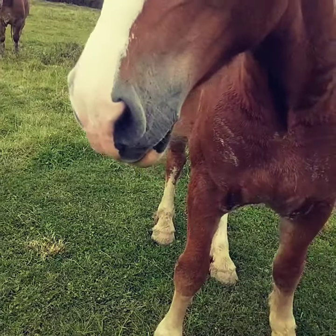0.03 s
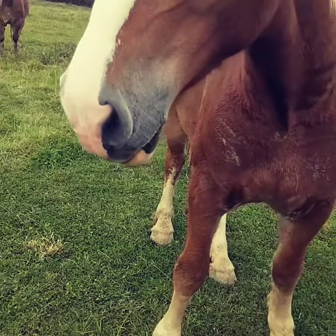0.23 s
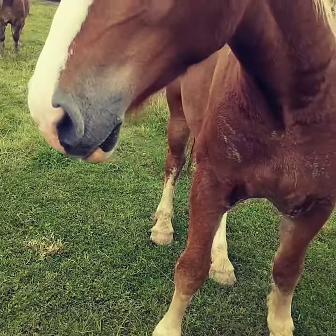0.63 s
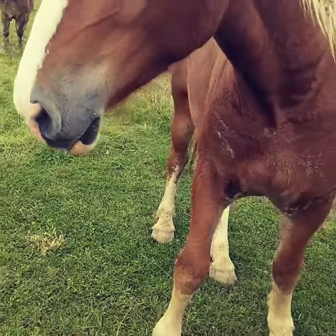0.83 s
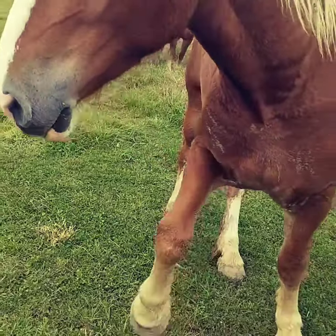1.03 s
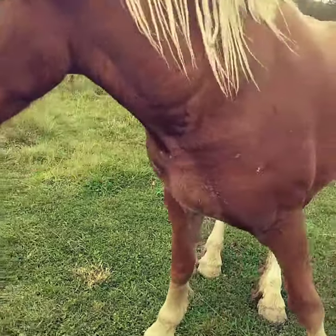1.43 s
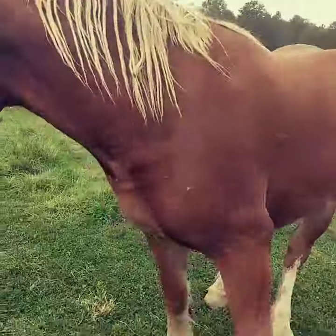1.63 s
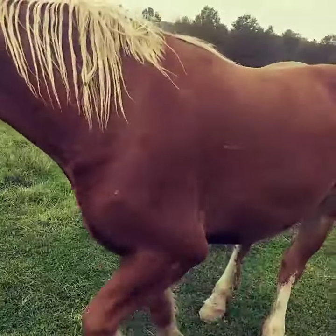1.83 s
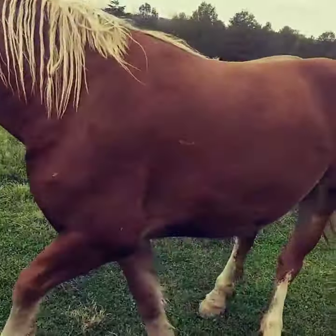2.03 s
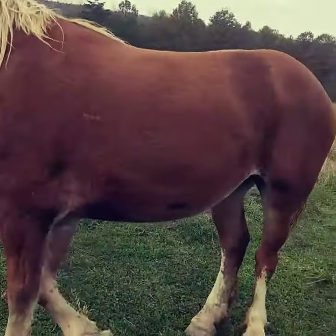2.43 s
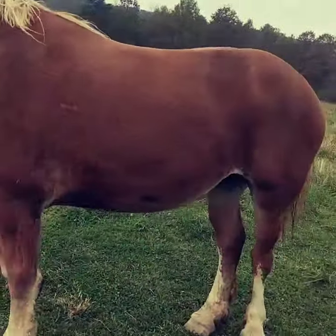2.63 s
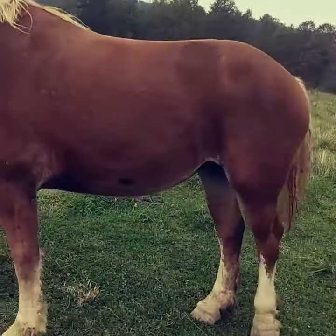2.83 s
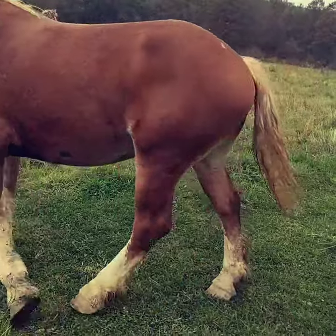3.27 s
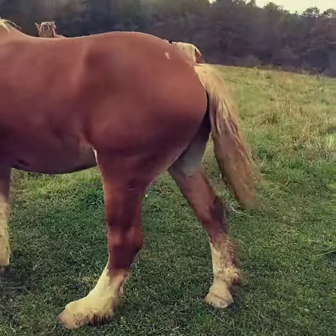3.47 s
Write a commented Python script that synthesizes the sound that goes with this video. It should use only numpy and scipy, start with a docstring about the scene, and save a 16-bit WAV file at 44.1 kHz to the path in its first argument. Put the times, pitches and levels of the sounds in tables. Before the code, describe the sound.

Dull, irregular hoof thuds of a horse passing close to the microphone in a grassy field, joined by swishing grass, tiny stalk snaps and a few small clacks. Underneath are a low breeze rumble and very faint insects.

```python
"""A low rumble of wind on a hand-held microphone, with insects hissing faintly in a grassy field.
A heavy horse walks slowly past, close by. Its hoof falls and puffs of breeze arrive as dull thumps,
short swings of low pressure, with a soft crush of turf and now and then a small hard clack.
Its legs swish through the grass, stalks snap, and hide and hoof rub on the turf."""
import sys
import numpy as np
from scipy import signal
from scipy.fft import rfft, irfft
from scipy.io import wavfile

SR = 44100
rng = np.random.default_rng(int(sys.argv[2]) if len(sys.argv) > 2 else 0)


def file_out(sig):
    """Save sig as 16-bit WAV at sys.argv[1]."""
    # one column per channel
    cols = np.atleast_2d(sig).T
    # limit, then scale
    lim = np.clip(cols, -1, 1)
    pcm = np.round(lim * 32767).astype(np.int16)
    wavfile.write(sys.argv[1], SR, pcm)


N = 154350
TIME = np.arange(N) / SR


def amp(db):
    """Decibels to gain."""
    return 10 ** (np.asarray(db) / 20)


def unit(x):
    """Scales to an rms of one."""
    return x / np.sqrt(np.mean(x ** 2) + 1e-20)


def shaped(x, gain):
    """Filters x by a gain given as a function of frequency."""
    return irfft(rfft(x) * gain(np.fft.rfftfreq(len(x), 1 / SR) + 1), len(x))


def coloured(x, points):
    """Filters x by a curve of (Hz, dB) points and scales it to unit rms."""
    f, db = np.transpose(points)
    return unit(shaped(x, lambda hz: amp(np.interp(np.log(hz), np.log(f), db))))


def drift(hz):
    """A random wander at unit rms, up to about the given rate."""
    return unit(shaped(rng.standard_normal(N), lambda f: np.exp(-(f / hz) ** 2)))


def swell(peak_s, rise, fall):
    """A smooth bell of level with its own rise and fall in seconds."""
    return np.exp(-.5 * ((TIME - peak_s) / np.where(TIME < peak_s, rise, fall)) ** 2)


def add(mix, start_s, sound):
    """Mixes a sound in at a time."""
    part = mix[max(round(start_s * SR), 0):][:len(sound)]
    part += sound[:len(part)]


# Open air all around the microphone. Each row: frequency in Hz, relative level in dB.
AIR_SPECTRUM = [(30, 3), (100, 13.5), (250, 3), (500, 0.5), (1000, -4.5), (2000, -7.5), (4000, -10),
                (6500, -13), (8000, -15.5), (9000, -21), (11000, -19.5), (16000, -22)]
# The slow swell of that hush. Each row: time in seconds, relative level in dB.
AIR_SWELL = [(0, 1), (.55, 0), (.95, -1), (1.3, 0.5), (1.75, 0.5), (2.05, -0.3), (2.6, 1.8), (2.88, 0.5),
             (3.5, 1.5)]

def air(level_db=-66.5):
    """The soft hush of the field, swelling a little."""
    level = level_db + np.interp(TIME, *np.transpose(AIR_SWELL))
    return amp(level) * coloured(rng.standard_normal(N), AIR_SPECTRUM)


# Insects, faint out in the field. Each row: start and end in seconds, pitch in Hz, level in dB.
INSECT_BURSTS = [(0, .25, 9960, -79.5), (0.023, .17, 10900, -83), (0, .17, 8550, -86),
                 (0.159, 0.375, 9500, -85), (0.229, .48, 8470, -85), (0.535, 0.662, 8400, -82),
                 (2.37, 2.472, 8300, -75.5), (2.534, 2.74, 8330, -79), (2.758, 2.866, 8400, -91)]

def insects(half_width_hz=220, fade_s=0.026, throb_db=1.5, throb_hz=58):
    """Insects come and go as thin, throbbing bands of hiss."""
    out = np.zeros(N)
    for start, end, hz, db in INSECT_BURSTS:
        t = np.arange(0, end - start, 1 / SR)
        noise = rng.standard_normal(N // 4)
        hiss = unit(shaped(noise, lambda f: 1 / (1 + ((f - hz) / half_width_hz) ** 2)))[:len(t)]
        fade = np.clip(np.minimum(t, t[::-1]) / fade_s, 0, 1)
        add(out, start, amp(db) * hiss * fade)
    return out * amp(throb_db * drift(throb_hz))


# Breeze right on the microphone. Each row: time in seconds, level in dB.
WIND_GUSTS = [(0, -57.5), (.2, -56), (.26, -51.5), (.56, -39.5), (.65, -53), (.8, -43.5), (1.25, -46.5),
              (1.36, -39.5), (1.47, -50), (1.6, -43), (1.72, -47.5), (1.9, -44), (2.55, -51), (2.66, -53.5),
              (2.85, -49.5), (3.12, -46.5), (3.27, -55), (3.5, -56)]
# Its deep rumble. Each row: frequency in Hz, relative level in dB.
WIND_SPECTRUM = [(15, -46.5), (30, -14), (48, 2.5), (65, 3.5), (100, -4.5), (150, -15.5), (220, -31.5),
                 (320, -39.5), (700, -83), (2000, -84)]

def wind(lumps_db=1, lumps_hz=14):
    """The breeze buffets the microphone with a lumpy low rumble."""
    level = np.interp(TIME, *np.transpose(WIND_GUSTS))
    rumble = coloured(rng.standard_normal(N), WIND_SPECTRUM)
    lumps = amp(lumps_db * drift(lumps_hz))
    return amp(level) * unit(rumble * lumps)


# Hide and hoof rubbing on the turf nearby. Each row: peak time and width in seconds, level in dB.
BODY_RUBS = [(.55, 0.25, -84), (1.12, 0.064, -76), (1.33, 0.15, -72), (1.475, 0.057, -65.5),
             (2.38, 0.049, -77), (2.53, 0.024, -73), (3.11, 0.045, -80)]
# The dull tone of a rub. Each row: frequency in Hz, relative level in dB.
RUB_SPECTRUM = [(100, -23), (300, 5.5), (700, -1), (1500, -3), (2800, -8.5), (5000, -13.5), (12000, -35)]

def rubs():
    """Soft swells of rubbing noise as the body moves."""
    power = sum((amp(db) * swell(s, width, width)) ** 2 for s, width, db in BODY_RUBS)
    return np.sqrt(power) * coloured(rng.standard_normal(N), RUB_SPECTRUM)


# Legs brushing through grass, close to the microphone.
# Each row: peak time, rise and fall in seconds, relative level in dB, share of crackle from 0 to 1.
LEG_STROKES = [(1.086, 0.0047, 0.014, -57.5, 0), (1.132, 0.022, 0.016, -62, 0.3),
               (1.24, 0.092, 0.083, -70.5, 0.2), (1.39, 0.044, 0.046, -68, 0.1),
               (1.45, 0.015, 0.0048, -53, 0.9), (1.504, 0.027, 0.018, -57.5, 0.75),
               (1.645, 0.044, 0.06, -66.5, 1), (1.81, 0.035, 0.066, -65.5, 0.8),
               (1.915, 0.047, 0.058, -63.5, 0.38), (2.19, 0.068, .05, -67.5, .4),
               (2.31, 0.059, 0.074, -65.5, 0.04), (2.396, 0.021, 0.0093, -56, 0.44),
               (2.44, 0.02, 0.034, -68.5, 0.9), (2.53, 0.013, 0.0085, -54, 0.75),
               (2.6, 0.14, 0.17, -66.5, .3), (2.975, 0.017, 0.023, -63, 0.5),
               (3.175, 0.074, 0.062, -63.5, 0.93), (3.33, 0.031, 0.036, -65, .5),
               (3.49, 0.033, .05, -71.5, 0.5)]
# Brushed grass at close range. Each row: frequency in Hz, relative level in dB.
GRASS_SPECTRUM = [(100, 8), (300, 0.5), (800, -2), (2000, -0.5), (3500, 0.5), (5300, 3), (7000, 5),
                  (9000, 5), (11000, -7.5), (16000, -13.5)]

def swishes(blades_per_s=3200, spread_db=4, gain_db=-3.5):
    """Blades flick against the legs: tiny clicks over a smooth rub, swelling with each stroke."""
    sizes = amp(spread_db * np.minimum(rng.exponential(1, N), 4))
    signs = rng.choice([-1, 1], N)
    hits = rng.random(N) < blades_per_s / SR
    flicks = coloured(sizes * signs * hits, GRASS_SPECTRUM)
    rub = coloured(rng.standard_normal(N), GRASS_SPECTRUM)
    flick_power, rub_power = np.zeros((2, N))
    for s, rise, fall, db, crackle in LEG_STROKES:
        power = (amp(db) * swell(s, rise, fall)) ** 2
        flick_power += crackle * power
        rub_power += (1 - crackle) * power
    return amp(gain_db) * (np.sqrt(flick_power) * flicks + np.sqrt(rub_power) * rub)


# Stalks breaking in the horse's path. Each row: start in seconds, relative level in dB, pitch in Hz.
STALK_SNAPS = [(0.4163, -47.5, 6850), (0.4297, -43.5, 6940), (0.4278, -49, 3220), (1.0815, -53, 6760),
               (1.137, -43.5, 8500), (1.4515, -56, 4500), (1.4517, -39, 3800), (1.466, -35.5, 7600),
               (1.4912, -41, 8500), (1.498, -60, 2800), (1.5143, -32, 7340), (1.562, -63, 4540),
               (1.568, -40, 8640), (1.6228, -46, 7050), (1.636, -52, 6000), (1.6466, -39, 7600),
               (2.398, -50, 8000), (2.4845, -43.5, 6500), (2.528, -47, 8000), (2.901, -56, 8000),
               (2.9488, -34, 5100), (2.984, -57, 7940), (3.2964, -50, 8100), (3.323, -45, 8000)]

def snaps(rise_s=0.0002, decay_s=0.00065, tail_s=0.0051, tail_db=-23.5, width_oct=0.55, gain_db=-1):
    """A stalk breaks in a millisecond crack with a faint tail."""
    out, t = np.zeros(N), np.arange(2048) / SR
    attack = 1 - np.exp(-t / rise_s)
    decay = np.exp(-t / decay_s) + amp(tail_db) * np.exp(-t / tail_s)
    for s, db, hz in STALK_SNAPS:
        noise = rng.standard_normal(len(t))
        crack = unit(shaped(noise, lambda f: 1 / (1 + (np.log2(f / hz) / width_oct) ** 2)))
        add(out, s, amp(db + gain_db) * attack * decay * crack)
    return shaped(out, lambda f: 1 / np.sqrt(1 + (f / 9260) ** 12))  # steep low-pass


# Small hard clacks at ground level, under the hooves.
# Each row: start in seconds, level in dB, pitch in Hz, relative level of the grit in dB.
HOOF_CLACKS = [(.2985, -49.5, 1130, -13.5), (2.2115, -48, 1010, -1.5), (2.2143, -51, 1060, -3),
               (2.2632, -58.5, 1730, 3.5), (3.087, -60.5, 940, 1.5)]
# The modes of a clack. Each row: ratio to the pitch, relative level in dB, seconds to fall by 60 dB.
RING_MODES = [(.38, -9, 0.011), (1, 3, 0.015), (2.15, -5, 0.005), (3.3, -6, 0.005)]
# Its gritty tick. Each row: frequency in Hz, relative level in dB.
GRIT_SPECTRUM = [(300, 4.5), (3800, -3), (6000, -20), (9000, -31), (16000, -47)]

def clacks(grit_decay_s=0.0039):
    """A hard contact under a hoof gives a gritty tick and a short woody ring."""
    out, t = np.zeros(N), np.arange(2048) / SR
    for s, db, hz, grit_db in HOOF_CLACKS:
        ring = sum(amp(level - 60 * t / t60) * np.sin(2 * np.pi * hz * ratio * t)
                   for ratio, level, t60 in RING_MODES)
        grit = coloured(rng.standard_normal(len(t)), GRIT_SPECTRUM) * np.exp(-t / grit_decay_s)
        add(out, s, amp(db) * (ring + amp(grit_db) * grit))
    return out


# Close hoof falls and puffs of breeze, as they reach the microphone. Each row: peak time in seconds,
# relative level in dB, pitch in Hz, width in seconds, firm contact in dB relative to the thump.
LOW_THUMPS = [(0.254, -38.5, 58.5, 0.012, -21), (0.323, -40, 102.6, 0.012, -7),
              (.355, -33, 65, 0.0083, -37), (.479, -29.5, 82.4, 0.0045, -12), (.512, -29, 61.6, 0.018, -20),
              (0.59, -28, 88.6, 0.0074, -17), (0.706, -37, 68, 0.015, -13.5),
              (.826, -31.5, 66.6, 0.0037, -13), (0.859, -31.5, 72.4, 0.012, -20),
              (0.927, -35.5, 88.6, 0.0064, -12.5), (.994, -37.5, 66.3, 0.02, -32),
              (1.042, -33, 70, 0.0034, -35), (1.141, -26, 72.3, 0.0071, -17.5),
              (1.188, -37.5, 97, 0.011, -17), (1.299, -40, 68, 0.0069, -34),
              (1.358, -29.5, 82, 0.0038, -6.5), (1.557, -38.5, 60, 0.011, -32), (1.615, -37, 85, 0.012, -7),
              (1.784, -38.5, 80, 0.0051, -30), (1.918, -31, 72, 0.0053, -8.5),
              (2.026, -25, 73, 0.0054, -19.5), (2.098, -29, 94, 0.0045, -9), (2.185, -37.5, 95, 0.0079, -6),
              (2.215, -36, 114, 0.015, -4), (2.3, -36.5, 73, 0.018, -28), (2.345, -28, 99, 0.0054, -12),
              (2.453, -33.5, 76, 0.0036, -37), (2.499, -32.5, 64.5, 0.0061, -19),
              (2.572, -32, 67.3, 0.014, -12.5), (2.881, -32.5, 78.4, 0.0055, -30),
              (2.92, -31, 77, 0.0037, -19.5), (2.977, -32, 71, .012, -12), (3.178, -31.5, 69, 0.011, -21),
              (3.219, -30.5, 82.6, 0.0081, -12)]
CONTACT_LEAD_S = 0.0028  # the contact comes just ahead of the peak

def thumps(sag=0.3, fall_over_rise=1.215, contact_hz=160, contact_width_s=0.0031, gain_db=-2):
    """Each thump is a brief firm contact and a swing or two of low pressure that sags in pitch."""
    out = np.zeros(N)
    for s, db, hz, width, firm_db in LOW_THUMPS:
        age = np.clip((TIME - s) / width, -20, 20)  # in widths from the peak
        lag = sag * (np.sqrt(1 + age ** 2) - 1) / (1 + abs(age) / 10)
        cycles = hz * width * (age - lag)
        envelope = 2 / (np.exp(-age) + np.exp(age / fall_over_rise))
        swing = envelope * np.cos(2 * np.pi * cycles)
        t = TIME - s + CONTACT_LEAD_S
        contact = np.sin(2 * np.pi * contact_hz * t) / np.cosh(np.clip(t / contact_width_s, -20, 20))
        out -= amp(db) * (swing + amp(firm_db) * contact)
    return amp(gain_db) * out


# Soft turf crushed underfoot, close by. Each row: frequency in Hz, relative level in dB.
TURF_SPECTRUM = [(70, -25), (150, 3.5), (250, -2), (380, -18), (700, -25.5), (2000, -45)]

def turf(rise_s=0.004, fall_s=0.017, gain_db=-15.5):
    """Turf gives with a dull puff under each thump, louder for a firmer contact."""
    power = sum((amp(db + firm_db) * swell(s - CONTACT_LEAD_S, rise_s, fall_s)) ** 2
                for s, db, _, _, firm_db in LOW_THUMPS)
    return amp(gain_db) * np.sqrt(power) * coloured(rng.standard_normal(N), TURF_SPECTRUM)


def scene():
    """Horse, breeze and insects meet at one microphone, dry in the open field."""
    return (thumps() + turf() + wind() + swishes() + rubs() + snaps() + clacks() + insects() + air())[None]


def record(dry):
    """The hand-held microphone cuts the deep bass, rings at its port and loses the highest treble."""
    low_cut_hz, top_hz = 34, 15850
    port_hz, port_width_hz, port_db = 8510, 610, 9.5
    thinned = shaped(dry[0], lambda f: 1 / np.sqrt(1 + (low_cut_hz / f) ** 6))
    b, a = signal.iirpeak(port_hz, port_hz / port_width_hz, SR)
    port_ring = (amp(port_db) - 1) * signal.lfilter(b, a, thinned)
    low_pass = signal.firwin(511, top_hz, window=("kaiser", 9), fs=SR)
    return signal.oaconvolve(thinned + port_ring, low_pass, "same")[None]


dry = scene()
out = record(dry)
file_out(out)
```